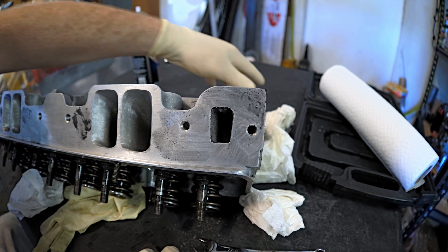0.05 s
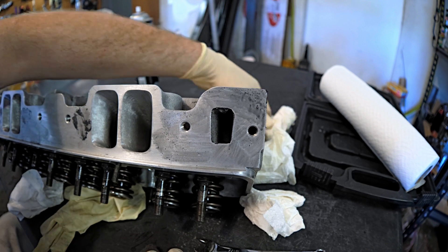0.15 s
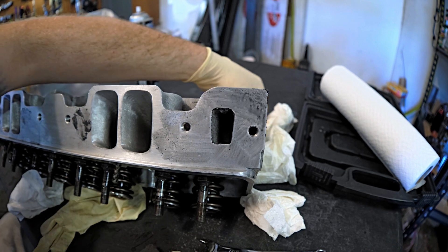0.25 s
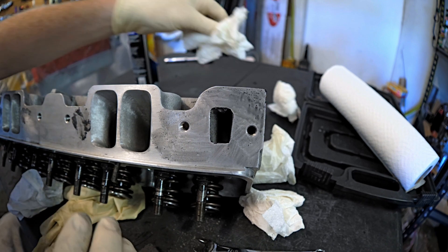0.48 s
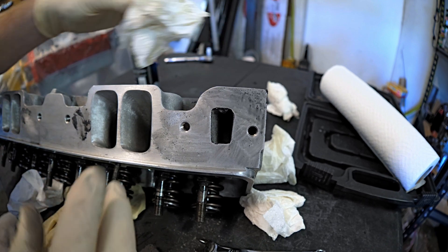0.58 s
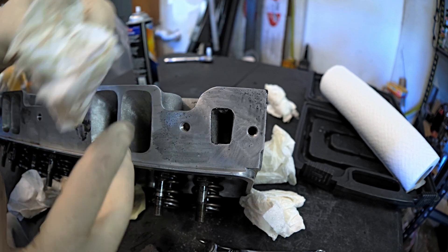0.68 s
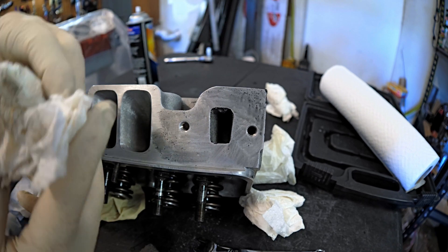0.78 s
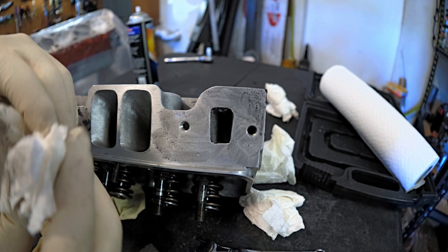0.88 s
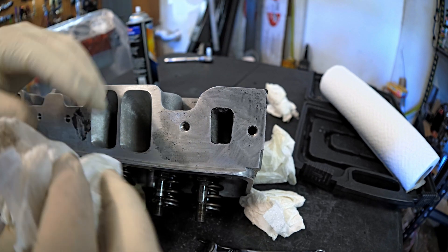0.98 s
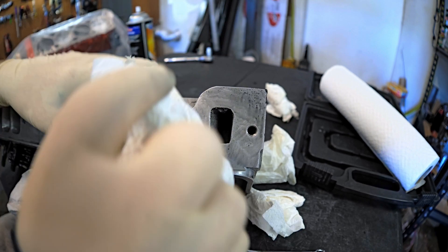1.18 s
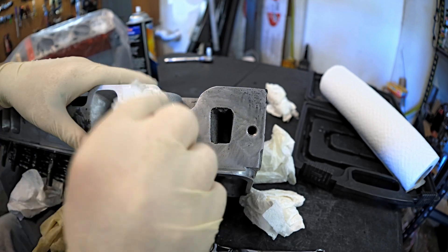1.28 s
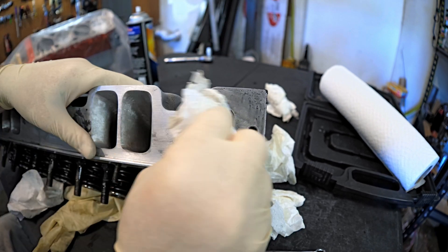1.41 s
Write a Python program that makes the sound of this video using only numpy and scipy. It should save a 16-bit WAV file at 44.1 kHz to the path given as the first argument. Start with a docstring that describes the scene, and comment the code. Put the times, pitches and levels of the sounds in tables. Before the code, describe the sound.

Paper towel wiping metal in three strokes, following a dull thump, a rustle and a tick.

```python
"""A dull bump sounds as a gloved hand lands on a workbench and snatches up a crumpled paper towel.
The impacts excite the bench's modes; the towel rustles as it is lifted, its fibres catching and slipping.
One sharp tick follows, then sliding friction scuffs the towel along a metal engine part in three strokes.
On the last one the rubber glove sticks and slips with a short low squeak. A small, quiet workshop."""
import sys
import numpy as np
from scipy import signal
from scipy.fft import rfft, irfft
from scipy.io import wavfile

SR = 44100
rng = np.random.default_rng(int(sys.argv[2]) if len(sys.argv) > 2 else 0)


def dump(signal):
    """Clip the signal to [-1, 1] and save it as 16-bit WAV at the path in sys.argv[1]."""
    limited = np.clip(np.atleast_2d(signal).T, -1, 1)
    pcm = np.round(limited * 32767).astype(np.int16)
    wavfile.write(sys.argv[1], SR, pcm)


N = 63945
TIME = np.arange(N) / SR


def from_db(db):
    """Amplitude ratio: tenfold for every 20 dB."""
    return 10 ** (np.asarray(db) / 20)


def unit_power(x):
    """Normalisation to a mean square of one."""
    return x / np.sqrt(np.mean(x ** 2) + 1e-20)


def envelope(rows):
    """Amplitude envelope through (t/s, level/dB) points, silent outside them."""
    t, db = np.transpose(rows)
    return from_db(np.interp(TIME, t, db, left=-140, right=-140))


def swell(peak_s, rise_s, fall_s):
    """Exponential growth to a peak, then exponential decay."""
    return np.exp(-np.maximum((peak_s - TIME) / rise_s, (TIME - peak_s) / fall_s))


def butterworth(x, order, hz, kind="low"):
    """Filtering with a maximally flat passband."""
    return signal.sosfilt(signal.butter(order, hz, kind, fs=SR, output="sos"), x + 1e-18)


def coloured(x, spectrum):
    """Source and filter: an excitation is shaped by (f/Hz, relative level/dB) points, at unit power."""
    hz, db = np.transpose(spectrum)
    bin_hz = np.maximum(np.arange(N // 2 + 1) * SR / N, 1)
    skirt = np.minimum(bin_hz / hz[0], 1) ** 2
    gain = from_db(np.interp(np.log(bin_hz), np.log(hz), db))
    return unit_power(irfft(rfft(x) * skirt * gain, N))


def drift(rate_hz):
    """Random fluctuation: low-passed noise of unit power."""
    return unit_power(butterworth(rng.standard_normal(N), 2, rate_hz))


def resonance(x, hz, width_hz):
    """A heavily damped resonance acts as a band-pass filter."""
    return butterworth(x, 2, [max(hz - width_hz / 2, 20), hz + width_hz / 2], "band")


def impulse(at_s, db):
    """An ideal impact, shared between the two nearest samples."""
    return from_db(db) * np.maximum(1 - np.abs(TIME - at_s) * SR, 0)


def ring(force, modes):
    """Modal superposition: each (f/Hz, level/dB, T60/s) mode answers an impulse with a damped sine."""
    motion = 0
    for hz, db, t60 in modes:
        radius = np.exp(-np.log(1000) / (t60 * SR))
        angle = 2 * np.pi * hz / SR
        feedback = [1, -2 * radius * np.cos(angle), radius ** 2]
        motion = motion + from_db(db) * signal.lfilter([0, np.sin(angle)], feedback, force + 1e-18)
    return motion


def reverberation(start_s, spectrum, rise_s, t60_s):
    """A diffuse field: reflections build up after a blow and decay exponentially."""
    age = np.maximum(TIME - start_s, 0)
    build_up = 1 - np.exp(-age / rise_s)
    decay = np.exp(-np.log(1000) * age / t60_s)
    return coloured(rng.standard_normal(N), spectrum) * build_up * decay


def fibres(slips_per_s=38000, spread_db=1.8, rough_db=1.0, clump_hz=90):
    """Shot noise: countless paper fibres catch and slip, in small clumps."""
    slips = rng.random(N) < slips_per_s / SR
    sizes = from_db(spread_db * np.minimum(rng.exponential(1, N), 6)) * rng.standard_normal(N)
    return slips * sizes * from_db(rough_db * drift(clump_hz))


def stick_slip(hz, jitter):
    """Stick-slip oscillation: a friction tone of unsteady frequency and unit power."""
    unsteady_hz = hz * (1 + jitter * drift(rate_hz=110.5))
    return np.sqrt(2) * np.sin(2 * np.pi * np.cumsum(unsteady_hz) / SR)


def workshop_air():
    """Stationary noise: the quiet background of the room."""
    # background spectrum: f/Hz, relative level/dB
    spectrum = [(25, -22), (65, -15), (105, 0), (160, -3), (240, 6), (400, -2.5), (800, -0.5),
                (1050, -17.5), (1350, -10.5), (1750, -21.5), (2050, -14), (2230, -8.5), (2450, -19),
                (2800, -20.5), (7000, -16), (10000, -21), (15500, -29)]
    return from_db(-66) * coloured(rng.standard_normal(N), spectrum)


def rubber_glove():
    """Stick-slip friction on metal: a faint rising whistle in the light stroke, then a low squeak."""
    # envelope of the glove's drag: t/s, level/dB
    drag = [(1.368, -76), (1.383, -55), (1.395, -54), (1.401, -42), (1.407, -44), (1.417, -55), (1.43, -56),
            (1.45, -51)]
    whistle_s, glide_hz_per_s, squeak_hz = 1.266, 1800, 510
    whistle_hz = 1820 + glide_hz_per_s * (TIME - whistle_s)
    whistle = from_db(-59) * swell(whistle_s, rise_s=.045, fall_s=.045)
    whistle *= stick_slip(whistle_hz, jitter=.025)
    rub = from_db(-5) * unit_power(resonance(rng.standard_normal(N), squeak_hz, width_hz=340))
    return whistle + envelope(drag) * (stick_slip(squeak_hz, jitter=.05) + rub)


def towel_lifted():
    """Friction noise: the glove slides up to the wad, which is grabbed, crushed and carried over."""
    # envelopes of each movement: t/s, level/dB
    slide = [(.10, -77), (.17, -71.5), (.236, -60.5), (.249, -40.5), (.27, -45.5), (.31, -46.5), (.40, -77),
             (.48, -65), (.55, -80)]
    grab = [(.24, -70), (.27, -52.5), (.30, -45.5), (.345, -43), (.375, -42.5), (.40, -45.5), (.456, -49),
            (.50, -55.5), (.56, -77)]
    carry = [(.42, -78.5), (.51, -55.5), (.57, -62.5), (.69, -59), (.74, -62), (.80, -68.5), (.84, -80)]
    # rustle spectra: f/Hz, relative level/dB
    slide_spectrum = [(900, 1), (1300, -5), (1700, -2.5), (2250, 2), (2900, -2), (3500, -7), (4400, -0.5),
                      (4750, -1), (5100, -8.5), (6000, -7), (8200, -10.5), (9400, -27), (12000, -29.5),
                      (15500, -41)]
    grab_spectrum = [(900, -1), (1300, -2.5), (1700, -4), (2000, -0.5), (2900, 1.5), (3900, -5.5),
                     (4750, -1.5), (5200, -7.5), (5900, -2.5), (8200, -6), (9400, -10.5), (10000, -18),
                     (12000, -22), (12500, -31.5), (15500, -31.5)]
    crush_spectrum = [(1500, -14.5), (3000, -4.5), (4200, -23), (6200, -9), (7800, 2), (8600, -8.5),
                      (10000, -22.5), (15000, -42)]
    carry_spectrum = [(1000, -9.5), (1700, -15), (2020, 0.5), (2250, -8.5), (2600, 4), (3400, -13),
                      (4300, -13.5), (4900, -5.5), (5400, -8), (6100, -7.5), (8200, -9), (10000, -21.5),
                      (15500, -27)]
    crush = from_db(-39) * swell(.365, rise_s=.025, fall_s=.01) * coloured(fibres(), crush_spectrum)
    moves = [(slide, slide_spectrum), (grab, grab_spectrum), (carry, carry_spectrum)]
    return crush + sum(envelope(curve) * coloured(fibres(), spectrum) for curve, spectrum in moves)


def tick():
    """Impulse response: quickly damped high modes give a dry snap, followed by its reflections."""
    # the contact and its small rebound: t/s, level/dB
    contacts = [(0.7546, -20), (0.7545, -53), (0.7565, -32.5)]
    # modes of the snap: f/Hz, level/dB, T60/s
    modes = [(2220, -11.5, 0.012), (3360, -6.5, 0.0063), (3850, -14, 0.0045), (4430, -24, 0.0047),
             (5180, -20.5, 0.0063)]
    # spectrum of the reflections: f/Hz, relative level/dB
    room_spectrum = [(1200, -16), (1800, 0), (3300, 1), (5500, 1), (6800, -12), (10000, -21.5)]
    force = sum(impulse(t, db) for t, db in contacts)
    snap = butterworth(ring(force, modes), 3, (2080, 7200), "band")
    reflections = reverberation(contacts[0][0], room_spectrum, rise_s=.0024, t60_s=.23)
    return snap + from_db(-48.5) * reflections


def wiping():
    """Sliding friction: paper scuffs over metal in three strokes, fuller when pressed harder."""
    # stroke envelopes: t/s, level/dB
    firm_stroke = [(.836, -63), (.851, -51), (.876, -44.5), (.895, -49.5), (.915, -48), (.932, -43),
                   (.97, -39.5), (1.02, -41.5), (1.048, -39), (1.068, -45), (1.104, -43), (1.124, -56.5),
                   (1.146, -59.5)]
    light_stroke = [(1.14, -68), (1.18, -59), (1.214, -54), (1.264, -51), (1.335, -53.5), (1.36, -53.5),
                    (1.40, -56.5)]
    last_stroke = [(1.372, -62), (1.396, -41), (1.414, -44.5), (1.432, -43.5), (1.45, -36)]
    # spectra of paper pressed firmly and lightly: f/Hz, relative level/dB
    firm_spectrum = [(500, -15.5), (1050, -20), (1650, -3), (2150, -2), (2600, 0), (3400, -4.5), (4300, -9),
                     (5200, -3), (6400, -1), (7700, -0.5), (8600, -4), (9550, -10), (9950, -21),
                     (12000, -23.5), (15500, -36)]
    light_spectrum = [(500, -23), (1100, -7.5), (1750, -0.5), (2200, -2), (3650, -0.5), (4200, -11),
                      (5200, -5.5), (6400, 2), (8000, 1.5), (9500, -3), (10000, -18), (12000, -20.5),
                      (15500, -25)]
    pressure = envelope(firm_stroke)
    firm = (pressure + envelope(last_stroke)) * coloured(fibres(), firm_spectrum)
    # the first stroke deepens as more of the wad lies down
    contact = swell(1.10, rise_s=.13, fall_s=.0078) * np.sqrt(pressure / pressure.max())
    deep = from_db(-49) * contact * unit_power(resonance(fibres(), hz=1430, width_hz=620))
    light = envelope(light_stroke) * coloured(fibres(), light_spectrum)
    return firm + deep + light


def bench_bump():
    """Impact excitation: soft blows thud and ring the bench, and the room booms until the hand damps it."""
    # the hand lands and things on the bench rebound: t/s, level/dB, contact cutoff f/Hz
    knocks = [(0.2398, -8, 398), (0.2475, 2, 600), (0.2543, -12.5, 1100), (0.2606, -9.5, 453),
              (0.2779, -9, 328), (.285, -19, 630), (.296, -20.5, 330), (.312, -22.5, 303),
              (.321, -16.5, 400), (.345, -29, 280), (0.365, -24.5, 280)]
    # the bench's heavily damped resonances: f/Hz, bandwidth/Hz, relative level/dB
    broad_modes = [(299.6, 220, -10.5), (650, 40, -22.5), (793, 79, -21.5), (1286, 190, -21)]
    # its ringing modes: f/Hz, relative level/dB, T60/s
    ringing_modes = [(83, -16, .3), (115, -8.5, 0.61), (140, -12, .3), (199.7, 0, .36), (239.6, 2, 0.093),
                     (265.6, -2.5, .26), (340.5, 6, 0.18), (352, -5.5, .33), (420, -7.5, .15),
                     (471, -20, 0.3), (654, 0, 0.067), (830, -12, .2), (1153, -8, 0.17), (1263, -6.5, 0.27)]
    # spectrum of the room's boom: f/Hz, relative level/dB
    boom_spectrum = [(35, -41), (70, -12), (120, -5), (330, -5), (520, -14), (700, -9), (880, -14.5),
                     (1020, -18), (1150, -17), (1330, -17.5), (1650, -34.5), (4000, -64)]
    hollow_hz, hollow_width_hz = 1034, 100  # a dip between the bench's resonances
    damp_from_s, damp_db_per_s = .41, 100  # the hand's weight deadens the ringing
    force = sum(butterworth(impulse(t, db), 2, hz) for t, db, hz in knocks)
    thud = sum(from_db(db) * resonance(force, hz, width) * SR / (2 * width)
               for hz, width, db in broad_modes)
    bench = butterworth(thud + from_db(-23) * ring(force, ringing_modes), 4, 84, "high")
    boom = from_db(-21.5) * reverberation(.249, boom_spectrum, rise_s=.008, t60_s=.38)
    hollow = signal.iirnotch(hollow_hz, hollow_hz / hollow_width_hz, fs=SR)
    damping = from_db(-damp_db_per_s * np.maximum(TIME - damp_from_s, 0))
    return signal.lfilter(*hollow, bench + boom) * damping


def scene():
    """Superposition: the sources add to the workshop's background in one channel."""
    return (workshop_air() + bench_bump() + towel_lifted() + tick() + wiping() + rubber_glove())[None]


def record(dry):
    """Band limiting: a steep elliptic low-pass removes the highest treble."""
    cutoff_hz = 15760
    return signal.sosfilt(signal.ellip(10, .1, 80, cutoff_hz, fs=SR, output="sos"), dry)


dry = scene()
out = record(dry)
dump(out)
```